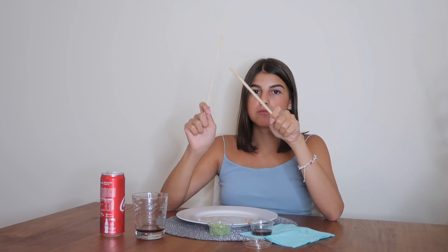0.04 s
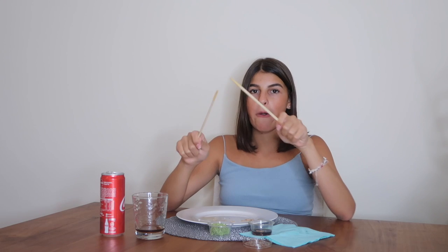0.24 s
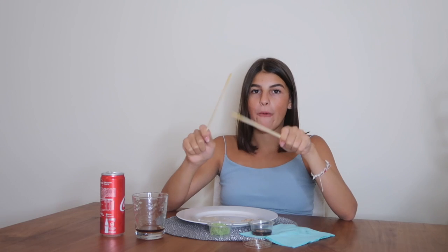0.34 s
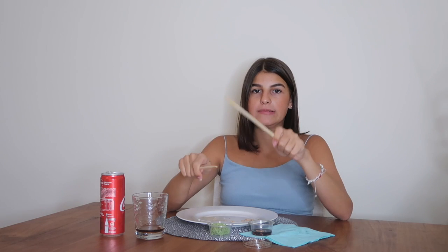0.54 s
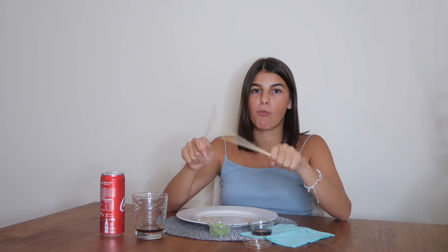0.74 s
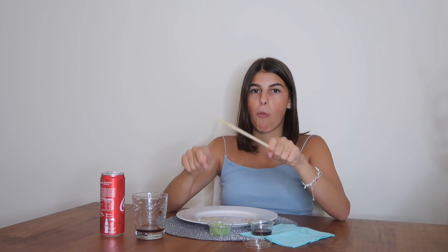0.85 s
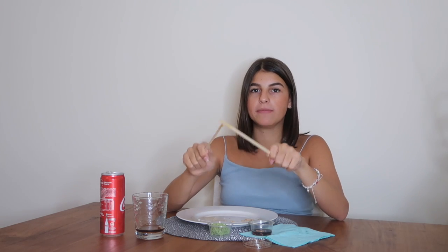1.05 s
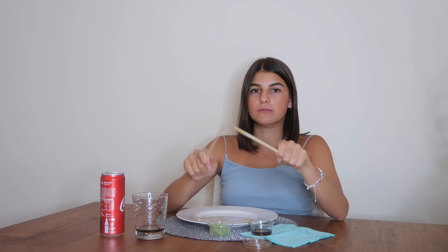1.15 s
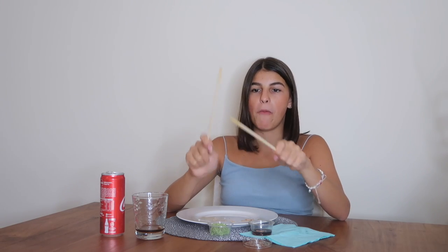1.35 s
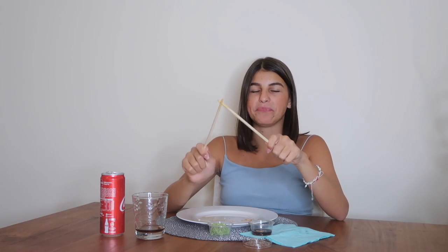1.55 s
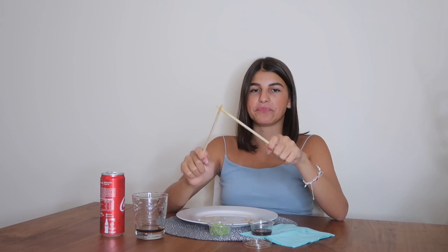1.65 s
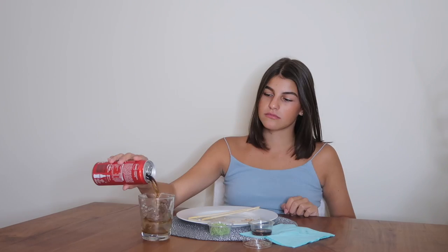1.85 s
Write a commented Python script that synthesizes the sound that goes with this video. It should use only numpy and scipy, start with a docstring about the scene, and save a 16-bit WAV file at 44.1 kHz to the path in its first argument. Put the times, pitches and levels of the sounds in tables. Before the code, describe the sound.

Two wooden chopsticks touch lightly, then knock together seven times in an uneven rhythm. Each click is short and bright with a slight echo, heard from nearby in a small, bare room with a low hum and faint hiss.

```python
"""A low hum and faint hiss fill a small, bare, quiet room from the start. Two wooden chopsticks touch
lightly, then are knocked together seven times over a dining table. Each contact excites damped modes
that ring for a few milliseconds. The low modes arrive first, by the direct path; the bright crack
follows mostly by reflection from table and walls, then dies away as reverberation."""
import sys
import numpy as np
from scipy import signal
from scipy.fft import rfft, irfft, next_fast_len
from scipy.io import wavfile

SR = 44100
rng = np.random.default_rng(int(sys.argv[2]) if len(sys.argv) > 2 else 0)


def dump(signal):
    """Clip the signal to [-1, 1] and save it as 16-bit WAV at the path in sys.argv[1]."""
    limited = np.clip(np.atleast_2d(signal).T, -1, 1)
    pcm = np.round(limited * 32767).astype(np.int16)
    wavfile.write(sys.argv[1], SR, pcm)


N = 83790
TIME = np.arange(N) / SR


def from_db(db):
    """Amplitude ratio: tenfold for every 20 dB."""
    return 10 ** (np.asarray(db) / 20)


def at_hz(points, hz):
    """Interpolation of a table along a logarithmic frequency axis."""
    points = np.array(points)
    return np.interp(np.log(hz + 1e-9), np.log(points[:, 0]), points[:, 1])


def colour(x, points):
    """Zero-phase filtering by a table of frequency in Hz and gain in dB."""
    size = 2 * next_fast_len(x.shape[-1])
    gain = from_db(at_hz(points, np.fft.rfftfreq(size, 1 / SR)))
    return irfft(rfft(x, size) * gain)[..., :x.shape[-1]]


def add(out, x, start_s):
    """Superposition of a sound on the mix from a given time."""
    start = max(int(start_s * SR), 0)
    out[..., start:start + x.shape[-1]] += x[..., :max(N - start, 0)]


def wavering_tone(hz, waver_rad=0.54, knots=14):
    """Slow random phase modulation of a sine of unit power."""
    wander = np.interp(TIME, np.linspace(0, TIME[-1], knots), rng.standard_normal(knots))
    return np.sqrt(2) * np.sin(2 * np.pi * (hz * TIME + rng.random()) + waver_rad * wander)


def hum(main_hz=97.8, gain_db=-2):
    """Amplitude modulation: a low tone swells and fades over steady ones, alike on both sides."""
    # Each row: time in seconds, relative level of the main tone in dB.
    swell_levels = [(0.0, -52.5), (0.184, -52.5), (0.512, -70.5), (0.57, -64.5), (0.618, -65),
                    (0.64, -51.5), (1.032, -54.5), (1.152, -64), (1.184, -65), (1.406, -53), (1.55, -51.5),
                    (1.9, -67)]
    # Each row: frequency of a steady tone in Hz, level in dB.
    steady_tones = [(49, -77), (70.5, -65.5), (143, -70), (197, -73)]
    swell = from_db(gain_db + np.interp(TIME, *np.transpose(swell_levels)))
    return swell * wavering_tone(main_hz) + sum(from_db(db) * wavering_tone(hz) for hz, db in steady_tones)


def diffuse_noise(size):
    """A diffuse field: white noise from all sides, its left-right correlation set by frequency."""
    # Each row: frequency in Hz, correlation between left and right.
    coherence = [(60, .99), (110, .95), (200, .5), (380, .12), (700, .1), (1290, .3), (2380, .88),
                 (3400, .72), (5500, .2), (9000, -.4), (15000, -.55)]
    mid, side = rfft(rng.standard_normal((2, size)))
    alike = np.clip(at_hz(coherence, np.fft.rfftfreq(size, 1 / SR)), -1, 1)
    return irfft(np.sqrt((1 + alike) / 2) * mid + np.sqrt((1 - alike) / 2) * side * [[1], [-1]], size)


def room_floor(level_db=-52.5):
    """Stationary diffuse noise, heard as rumble and faint hiss."""
    # Each row: frequency in Hz, relative spectral density in dB.
    spectrum = [(15, -49), (25, -11), (117, -13), (249, -12.5), (591, -17.5), (659, -20.5), (734, -18),
                (1020, -21), (1370, -23.5), (1840, -26.5), (3250, -27.5), (4740, -31.5), (11900, -40.5),
                (14400, -48.5), (16000, -70.5)]
    noise = colour(diffuse_noise(N), spectrum)
    return from_db(level_db) * noise / np.sqrt(np.mean(noise ** 2))


def stick_modes(tuning, group_dbs, gain_db=10.5, size=4096, stages=3):
    """Modal vibration: an impulse sets heavily damped modes swelling and dying within milliseconds."""
    # Six groups of modes. Each row: nominal frequency in Hz, stage bandwidth in Hz, relative level in dB.
    hollow = [(1150, 526, -17.5)]
    low = [(2510, 1056, -7.5)]
    main = [(3078, 475, -6.5), (3725, 1010, 3)]
    upper = [(4983, 1570, -5), (5803, 1330, -4)]
    high = [(7075, 2150, -8.5), (8420, 2370, -9.5), (9820, 1520, -5)]
    top = [(11870, 2900, -11), (12640, 570, -10), (13300, 2600, -12.5)]
    impulse = signal.unit_impulse(size) + 1e-18
    out = np.zeros(size)
    for modes, group_db in zip((hollow, low, main, upper, high, top), group_dbs):
        for hz, width_hz, db in modes:
            radius = np.exp(-np.pi * width_hz / SR)
            angle = 2 * np.pi * hz * tuning / SR
            gain = (1 - radius ** 2) / 2
            resonator = [gain, 0, -gain, 1, -2 * radius * np.cos(angle), radius ** 2]
            ring = signal.sosfilt([resonator] * stages, impulse)
            out = from_db(gain_db + group_db + db) * ring - out  # successive modes alternate in sign
    return out


def early_echoes(knock, wander_ms=.1, scatter_start_s=.0062, scatter_length_s=.0042, scatter_db=-5):
    """Reflection and scattering: echoes that shift as the hands move, and a cluster off nearby walls."""
    # Table, walls and ceiling. Each row: delay in ms, gain in dB, left-right lag in microseconds.
    echoes = [(4.25, -13, 5), (6.35, -7, -10), (7.8, -11, 25), (9.5, -3, 35), (19.5, -17, 20),
              (21.8, -14, -35), (28, -18, 30)]
    # Radiation towards the walls. Each row: frequency in Hz, gain in dB.
    echo_tone = [(1000, -5), (3500, -7), (5500, 1.5), (9000, 2), (14000, -8)]
    size = len(knock)
    hz, t = np.fft.rfftfreq(size, 1 / SR), np.arange(size) / SR
    paths = 0
    for ms, db, lag_us in echoes:
        delay_ms = ms + wander_ms * rng.standard_normal()
        delay_s = delay_ms / 1e3 + lag_us / 2e6 * np.array([[1], [-1]])
        paths = paths + from_db(db) * np.exp(-2j * np.pi * hz * delay_s)
    window = np.exp(-(2 * (t - scatter_start_s) / scatter_length_s - 1) ** 4)
    cluster = from_db(scatter_db) * diffuse_noise(size) * window / np.linalg.norm(window)
    return colour(irfft(rfft(knock) * (paths + rfft(cluster))), echo_tone)


def room_tail(radiated, gain_db=1.5, onset_db=-3.5, build_up_s=.018, bands=24):
    """Reverberation: thin until the far walls answer, each band decaying exponentially at its own rate."""
    # Each row: frequency in Hz, time to decay by 60 dB in seconds.
    decay_times = [(1000, 0.17), (2500, 0.65), (3200, 0.45), (4100, 0.57), (4800, 0.46), (5800, 0.52),
                   (7000, 0.47), (9500, 0.42), (14000, 0.17)]
    # Each row: frequency in Hz, gain into the reverberant field in dB.
    tail_tone = [(1000, -8), (1700, 12.5), (2400, -8.5), (3200, -6), (3800, -9), (4500, -1), (5500, 0.5),
                 (7000, -2), (9500, -2.5), (12500, -4), (15500, -18)]
    t, hz = np.arange(SR) / SR, np.fft.rfftfreq(SR, 1 / SR)
    centres = np.geomspace(800, 16000, bands)
    noise, tail = rfft(diffuse_noise(SR)), 0
    for centre, share in zip(centres, np.eye(bands)):
        band = irfft(noise * np.interp(hz, centres, share))
        tail = tail + band * 1e-3 ** (t / at_hz(decay_times, centre))
    tail = tail * from_db(np.interp(t, [0.66 * build_up_s, build_up_s], [onset_db, 0]))
    tail = from_db(gain_db) * tail / np.linalg.norm(tail[0])
    return signal.fftconvolve(colour(radiated, tail_tone)[None], tail, axes=-1)[:, :N]


def chopsticks(touch_direct_db=4.5):
    """Multipath propagation: each impact arrives directly, off nearby surfaces and through the room."""
    # Each row: start in seconds, tuning ratio, gains in dB of the low, main and treble modes.
    touches = [(0.0006, 0.967, -13.5, -18.5, -19.5), (0.0851, 0.712, -42, -25, -34),
               (0.2062, 1.187, -27, -23, -39), (0.2312, 2, -29, -29, -32.5)]
    # The contact point sets the tuning and the share of each group of modes. Each row: start in seconds,
    # tuning ratio, gains in dB of the hollow, low, main, upper, high and top modes and of the direct path.
    knocks = [(0.2459, 1.022, 1, 1, 1, -2, -1.5, 4.5, 5.5), (0.5391, 1, 3, -1.5, 0, -2, 2.5, 9, 3),
              (0.7428, 0.98, 1.5, -0.5, -6.5, -12.5, 1, 8, 6),
              (0.9373, 1, -5.5, -5, -11.5, -11, -10, -2, 6), (1.0167, 1.013, -5.5, -1, -3, -4, -5, -6, 4.5),
              (1.5238, 1.022, -3, -5, -10, -14, -12, -7.5, 2.5),
              (1.5924, .99, -5, -10, -8, -8, -8, 3.5, 5.5)]
    # Forward radiation. Each row: frequency in Hz, gain in dB.
    direct_tone = [(1000, -10.5), (2200, -7), (3000, -4.5), (3800, -4), (4700, -11), (5500, -14),
                   (8000, -15.5), (14000, -16.5)]
    light_knocks = [(start_s, tuning, low, low, main, treble, treble, treble, touch_direct_db)
                    for start_s, tuning, low, main, treble in touches]
    near, radiated = np.zeros((2, N)), np.zeros(N)
    for start_s, tuning, *group_dbs, direct_db in list(knocks) + light_knocks:
        knock = stick_modes(tuning, group_dbs)
        direct = from_db(direct_db) * colour(knock, direct_tone)
        add(near, direct + early_echoes(knock), start_s)
        add(radiated, knock, start_s)
    return near + room_tail(radiated)


def scene():
    """Superposition of the chopsticks and the quiet background."""
    return chopsticks() + hum() + room_floor()


def record(dry, cutoff_hz=16000):
    """Band limiting: an elliptic low-pass filter cuts the highest treble steeply."""
    return signal.sosfilt(signal.ellip(10, .1, 80, cutoff_hz, fs=SR, output="sos"), dry)


dry = scene()
out = record(dry)
dump(out)
```